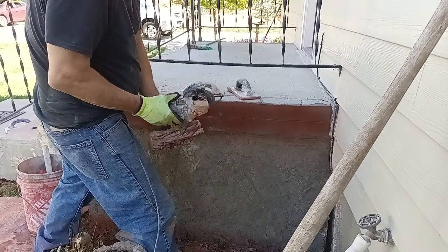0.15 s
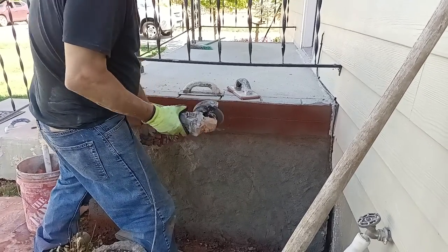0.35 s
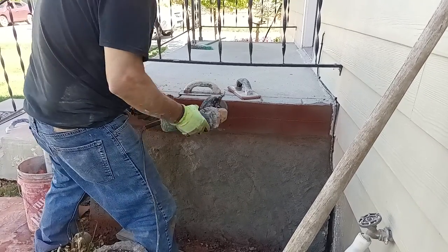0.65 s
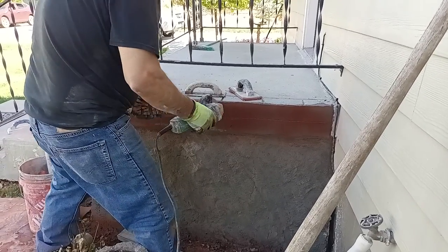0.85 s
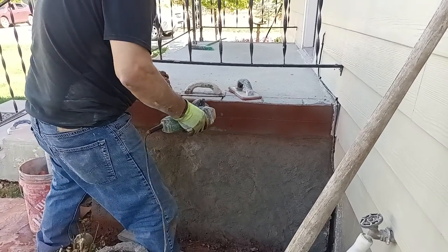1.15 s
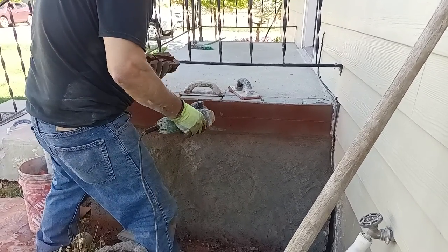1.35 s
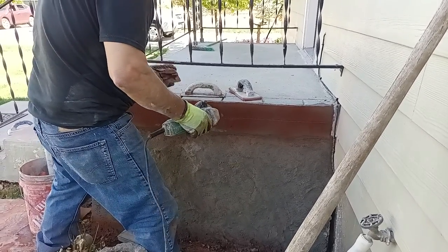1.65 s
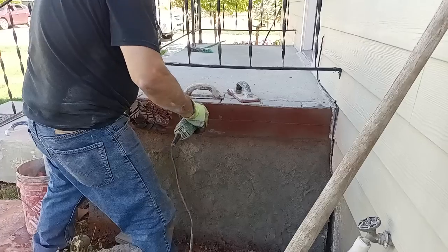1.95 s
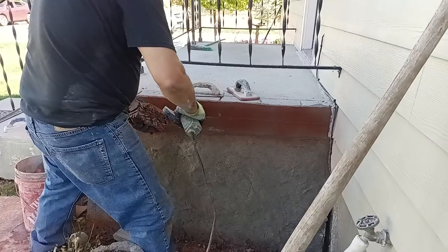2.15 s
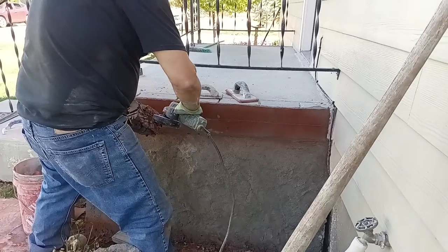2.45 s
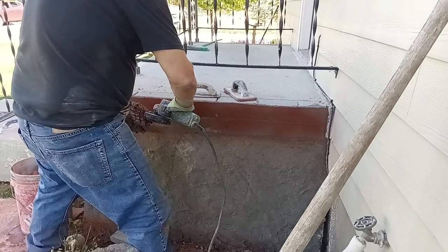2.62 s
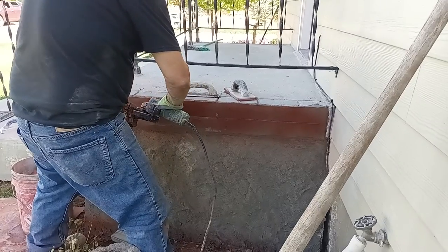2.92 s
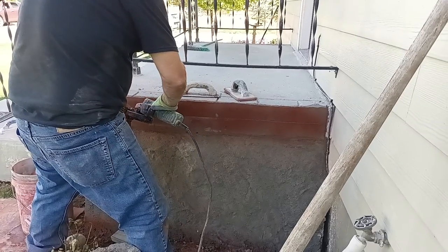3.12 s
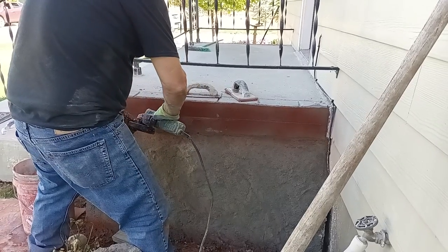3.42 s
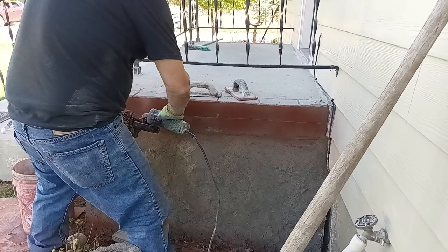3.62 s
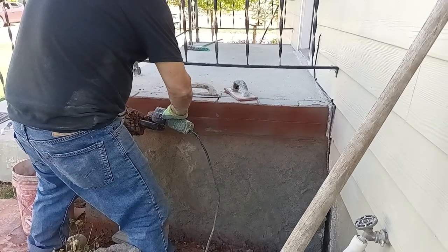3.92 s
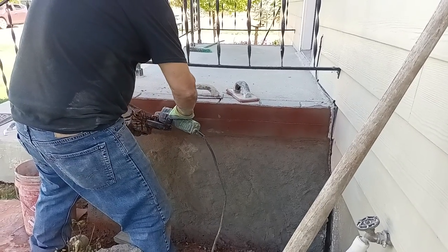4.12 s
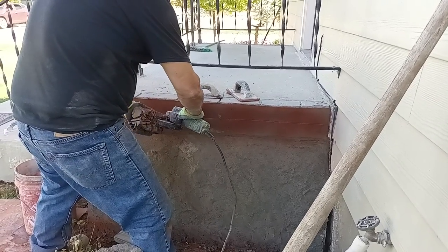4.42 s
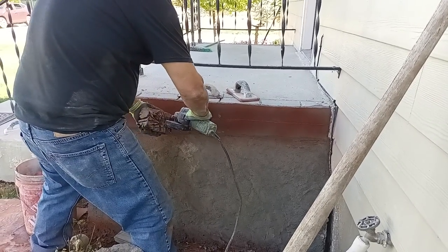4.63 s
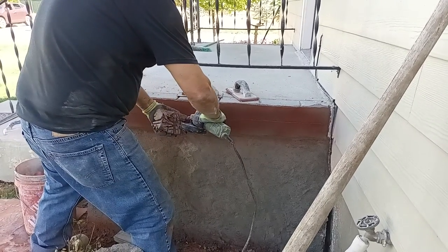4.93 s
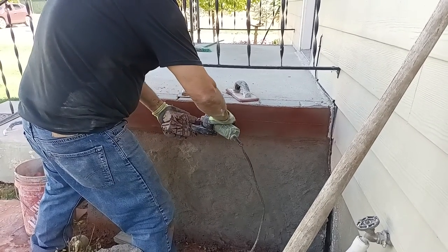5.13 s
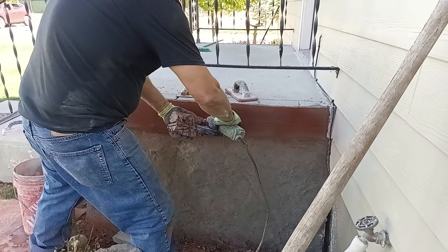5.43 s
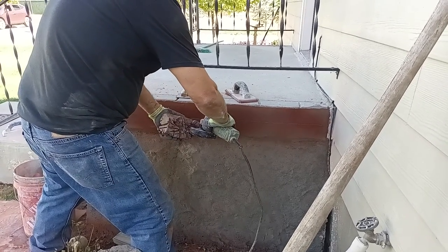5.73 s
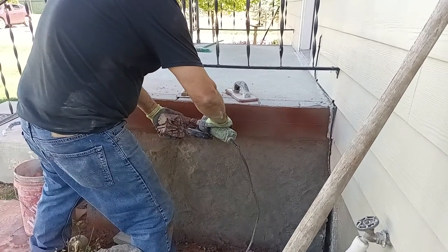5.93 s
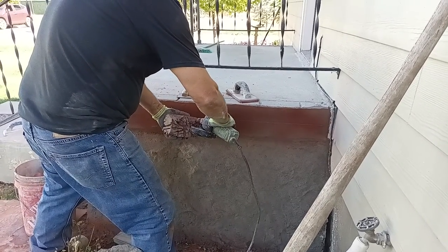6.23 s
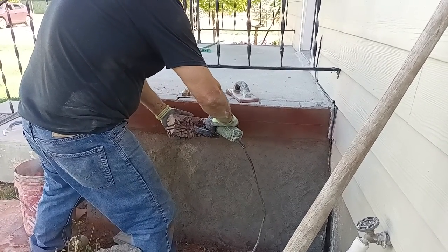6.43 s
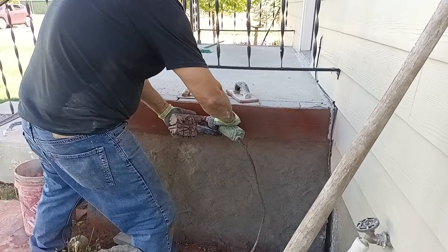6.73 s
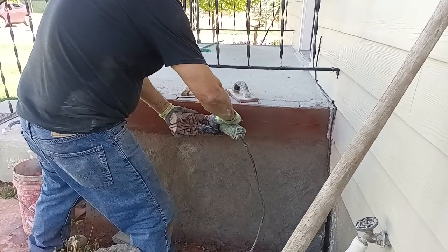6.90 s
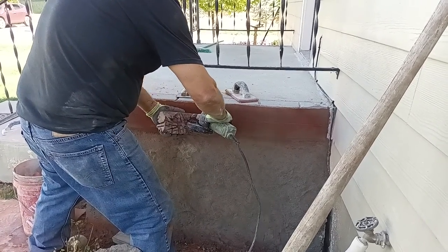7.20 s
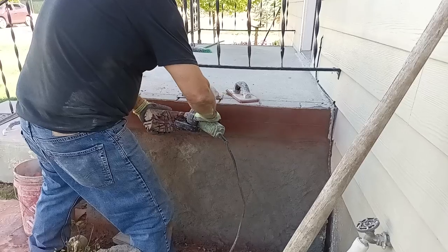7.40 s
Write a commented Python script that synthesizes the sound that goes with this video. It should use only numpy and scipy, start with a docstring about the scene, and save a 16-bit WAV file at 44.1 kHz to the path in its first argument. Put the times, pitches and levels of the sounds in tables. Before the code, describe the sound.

Loud electric grinder whirring and rasping on masonry, its disc ringing in shrill shifting squeals, with gritty hiss and low wind buffets.

```python
"""Angle grinder cutting brick

An angle grinder runs up to speed and cuts into a brick step outdoors, beside a house wall.
Grit noise rings the steel disc's modes in a chattering cut, and single modes sing out.
The shaft hums in wavering sines; the cooling fan and the brick dust are shaped noise.
The left microphone port faces away and hears a dull, late sound; wind pops on the right port."""
import sys
import numpy as np
from scipy import signal
from scipy.fft import rfft, irfft, next_fast_len
from scipy.io import wavfile
from scipy.ndimage import uniform_filter1d, map_coordinates

SR = 44100
rng = np.random.default_rng(int(sys.argv[2]) if len(sys.argv) > 2 else 0)


def wrap_up_sound(samples):
    """Save the sound to the file named by the first command line argument, as 16-bit audio."""
    columns = np.atleast_2d(samples).T
    # keep every value between -1 and 1, then stretch to whole-number steps
    tamed = np.clip(columns, -1, 1)
    steps = np.round(tamed * 32767).astype(np.int16)
    wavfile.write(sys.argv[1], SR, steps)


N = 333396
T = np.arange(N) / SR  # time of every sample, in seconds

# How hard the grit rubs, before bites and flicker are added: (time [s], level [dB])
RUBBING = [(0, -28), (.22, -29.5), (.34, -24), (2, -23), (2.62, -28), (2.67, -20.5), (3.15, -25),
           (3.55, -21), (4, -20), (4.6, -22), (5.5, -21), (5.75, -23), (6.08, -24), (6.13, -19),
           (6.3, -20.5), (7.56, -22)]

# The disc sinks into the cut at this time; the shaft sags and the fan changes over SAG_S
SINK_S, SAG_S = 2.6, .5
# The tool swings out from behind the worker's body and opens up
OPEN_S, OPENING_S = 0.26, 0.03


def amp(db):
    """Gain of a level in dB."""
    return 10 ** (np.asarray(db) / 20)


def unit(x):
    """Scale x to an rms of 1."""
    return x / np.sqrt(np.mean(x ** 2) + 1e-20)


def along(points, hz):
    """Read between (frequency, value) points on a log frequency axis."""
    f, values = np.transpose(points)
    return np.interp(np.log(hz + 1), np.log(f + 1), values)


def curves(rows):
    """One value per sample for each column after the time."""
    s, *columns = np.transpose(rows)
    return [np.interp(T, s, column) for column in columns]


def wobble(rate):
    """A smooth random curve through `rate` random points a second."""
    points = rng.standard_normal(int(N * rate / SR) + 4)
    return map_coordinates(points, [T * rate])


def after(s, rise_s):
    """A smooth step from 0 to 1, halfway at time s."""
    return 1 / (1 + np.exp(-np.clip(2 * (T - s) / rise_s, -50, 50)))


def held(s, length):
    """A gate that rises, holds and falls."""
    rise_s, fall_s = 0.027, 0.084
    rise = (T - s) / rise_s
    fall = (s + length - T) / fall_s + .5
    return np.clip(np.minimum(rise, fall), 0, 1)


def filtered(x, response):
    """Filter x by a response given as a function of frequency in Hz."""
    m = next_fast_len(N + SR // 4)
    spectrum = rfft(x, m) * response(np.fft.rfftfreq(m, 1 / SR))
    return irfft(spectrum, m)[..., :N]


def rush(points, patchy_db):
    """Two unrelated noises shaped by (Hz, dB) points, sharing patches of random gain."""
    z = signal.stft(rng.standard_normal((2, N)), nperseg=512)[2]
    field = uniform_filter1d(rng.standard_normal(z.shape[1:]), size=3, axis=0)
    field = uniform_filter1d(field, size=16, axis=1)
    noise = signal.istft(z * amp(patchy_db * unit(field)), nperseg=512)[1][:, :N]
    return unit(filtered(noise, lambda f: amp(along(points, f))))


def combed(x, depth_db):
    """Pass x through many narrow resonances that come and go."""
    z = signal.stft(x, nperseg=2048)[2]
    field = uniform_filter1d(rng.standard_normal(z.shape[1:]), size=14, axis=1)
    return unit(signal.istft(z * amp(depth_db * unit(field)), nperseg=2048)[1][:, :N])


def turns():
    """Angle of the shaft in radians: it runs up towards full speed, then sags a little in the cut."""
    full_turns_per_s, start_short_by, run_up_s = 161.5, 48.5, .45
    sag_turns_per_s = 5.5
    run_up = start_short_by * np.exp(-T / run_up_s)
    sag = sag_turns_per_s * (1 - np.exp(-np.clip(T - SINK_S, 0, None) / SAG_S))
    speed = (full_turns_per_s - run_up - sag) * (1 + 0.00303 * wobble(6))
    return 2 * np.pi * np.cumsum(speed) / SR


def contact(angle):
    """Changes of the rubbing in dB: swells at bounces and bites; the rim is out of true."""
    # Bites of the disc in the brick at set times, most of them hard, over the skimming;
    # each sound follows them more or less strongly: (time [s], level [dB])
    set_bites = [(.491, 5), (.729, 11.5), (1.726, 9), (2.024, 11), (2.278, 9), (2.326, 9), (2.51, 9.5),
                 (2.692, 10), (3.302, 6.5), (5.777, 10), (5.883, 10), (6.033, 10), (6.12, 7), (6.734, 7),
                 (7.349, 11)]
    bite_times, bite_sizes = np.transpose(set_bites)
    chatter_per_s, chatter_scatter = 20, .22  # bounces between the set bites
    chatter_db, chatter_sunk_db = 6, 4  # typical size while skimming, in the cut
    rise_s, fall_s = 0.009, 0.017

    draw = rng.standard_normal((300, 2))
    times = np.cumsum(np.exp(chatter_scatter * draw[:, 0])) / chatter_per_s
    sizes = np.where(times < SINK_S, chatter_db, chatter_sunk_db)
    sizes = sizes * np.clip(1 + .4 * draw[:, 1], 0, None)
    # leave out bounces that fall too close to a set bite
    gap = np.abs(times[:, None] - bite_times).min(axis=1)
    free = (gap > .03) & (times < T[-1])
    kicks = np.zeros(N)
    kicks[(times[free] * SR).astype(int)] = sizes[free]
    kicks[(bite_times * SR).astype(int)] = bite_sizes

    t = T[:SR // 10 + 1] - T[SR // 20]
    swell = np.exp(-(t / np.where(t < 0, rise_s, fall_s)) ** 2)
    bites_db = signal.fftconvolve(kicks, swell, "same")
    rim_db = 0.89 * np.cos(angle) + 0.5 * np.cos(2 * angle)  # once and twice a turn
    return bites_db - bites_db.mean() + 0.91 * wobble(28) + rim_db


def disc(rub_db):
    """Grit noise rings every mode a little; now and then the angle of the cut makes one sing."""
    # Modes of the disc and its guard: (frequency [Hz])
    modes_hz = [1095, 2200, 2600, 2940, 3570, 4060, 4750, 5085, 5555, 5865, 6190, 6500, 6620, 7440, 7570,
                7810, 8660, 8830, 9060, 9220, 11220]
    # Usual ring of each of those modes against the rubbing: (level [dB])
    modes_db = [-25.5, -26.5, -24, -18.5, -25, -24, -24, -15, -14, -16, -13, -13.5, -17, -11.5, -18, -43,
                -12.5, -18, -16.5, -23, -45]
    # One mode sings out, before bites and flicker:
    # (time [s], length [s], frequency near the mode [Hz], level [dB])
    squeals = [(0.28, 0.25, 3570, -30), (0.37, 0.22, 1095, -40), (0.28, 0.28, 5555, -32),
               (0.89, 0.1, 5555, -33), (1.42, .2, 5555, -34), (2.9, 0.74, 4060, -38),
               (2.66, 0.3, 4750, -39), (0.87, 1.35, 2600, -34), (0.8, 0.18, 1095, -44),
               (1.476, 0.28, 7440, -30.5), (3.78, 0.72, 5555, -35), (4.23, 0.082, 2940, -28),
               (0.683, 0.063, 7570, -24), (2.28, 0.36, 6190, -30.5), (2.39, 0.11, 5085, -30),
               (2.56, 0.55, 8660, -28.5), (3.47, 0.25, 6190, -26.5), (3.8, 0.38, 8660, -34),
               (3.47, 0.14, 11220, -29), (3.6, 0.12, 9060, -23), (3.5, 0.58, 1095, -50.5),
               (6.45, 0.25, 1095, -42.5), (2.45, 0.18, 5865, -23.5), (1.96, 0.93, 6500, -31.5),
               (2.7, 0.22, 5085, -39), (4.5, 1.2, 7810, -31.5), (4.2, 0.49, 9060, -20.5),
               (4.5, 0.592, 8660, -23.5), (4.8, 0.086, 5085, -25), (5, 0.46, 5085, -25.5),
               (5.19, 0.58, 5865, -29), (4.7, 0.54, 9220, -32), (6.1, 0.9, 5085, -29.5),
               (6.25, 0.78, 5555, -32), (6.76, 0.5, 8830, -26.5), (7.423, 0.14, 9220, -17),
               (7.3, 0.31, 9060, -24)]
    # resonance widths in Hz, otherwise 44
    widths = {2200: 90, 2600: 220, 3570: 140, 5085: 36, 8660: 70, 9060: 18}
    favour_db, favour_per_s = 2.5, 1.3  # the cut favours now one mode, now another
    sunk_ring_db = 6.5

    def nearest(hz):
        return modes_hz[np.argmin(np.abs(np.subtract(modes_hz, hz)))]

    grit_db, = curves(RUBBING)
    skimming = T < SINK_S
    out = 0
    for hz, usual_db in zip(modes_hz, modes_db):
        width = widths.get(hz, 44)
        feels = 1.25 if 5000 < hz < 8000 else .5  # these rim modes follow the bites most
        bite_db = feels * rub_db
        # skimming rings the highest modes and lowest rim mode less, low guard modes more
        sunk_side = (hz > 8000 or hz == 5085) - (2000 < hz < 2700)
        usual = bite_db + grit_db + usual_db + favour_db * wobble(favour_per_s)
        gain = amp(usual - sunk_ring_db * sunk_side * skimming)
        for s, length, mode_hz, db in squeals:
            if nearest(mode_hz) == hz:
                # once sunk, squeals follow the chatter half as much
                gain += amp(db + bite_db / (1 + (T > SINK_S))) * held(s, length)

        def ring(f):
            return 1j * f * width / (hz * hz - f * f + 1j * f * width)

        tone = unit(filtered(rng.standard_normal((2, N)), ring))
        flicker_db = 2.05 * wobble(7) + 2.28 * wobble(22)
        out = out + gain * amp(flicker_db) * tone
    return out


def shaft(angle, hidden):
    """Multiples of the shaft rate sound as broken, wavering tones, much quieter while hidden."""
    # Shaft tones before wobble and hiding: (time [s], hum level [dB], fourth multiple level [dB])
    shaft_tones = [(0, -64, -28), (.33, -52, -36), (.7, -53.5, -43.5), (1.4, -47, -45), (2.3, -51.5, -74),
                   (3.3, -56.5, -52), (4.8, -53, -53), (6, -52, -40), (6.9, -59, -50.5), (7.56, -53, -48.5)]
    # Upper tones, against their shared level: (multiple of the shaft rate, level [dB])
    upper_orders = [(2, -6.5), (3, -2), (5, 3), (7, 0.5)]
    # One multiple stands out for a moment, before wobble and hiding:
    # (time [s], length [s], multiple of the shaft rate, level [dB])
    order_swells = [(.31, 0.11, 5, -35), (.68, 0.18, 9, -40), (.9, 0.16, 10, -37), (1.544, 0.27, 5, -42.5),
                    (2.026, 0.16, 8, -39)]
    start_db, fade_db_per_s, hidden_db = -50, 2, -19.5

    def order(k, db):
        return amp(db + 3.5 * wobble(20)) * np.sin(k * angle + .9 * wobble(30))

    hum_db, fourth_db = curves(shaft_tones)
    upper_db = start_db - fade_db_per_s * T
    tones = amp(hum_db + 1.8 * wobble(6)) * np.sin(angle) + order(4, fourth_db)
    for k, db in upper_orders:
        tones += order(round(k), upper_db + db)
    for s, length, k, db in order_swells:
        tones += order(round(k), db) * held(s, length)
    return tones * amp(hidden_db * hidden) * [[1], [0]]  # no tones in the scattered sound


def fan(rub_db, hidden):
    """The cooling fan rushes as shaped, patchy noise that changes a little with load and bites."""
    # Colour of the rush: (frequency [Hz], relative level [dB per Hz])
    fan_colour = [(70, -10), (260, -34), (420, -18), (650, -7), (1100, -9), (1750, -2.5), (2200, 0),
                  (3500, 4), (4400, -4), (7000, -55)]
    free_db, hidden_db, loaded_db = -27.5, -3, -1.5  # running free; changes when hidden, in the cut
    fan_db = free_db + hidden_db * hidden + loaded_db * after(SINK_S, SAG_S)
    return amp(fan_db + 0.087 * rub_db) * combed(rush(fan_colour, patchy_db=2.5), depth_db=3.5)


def brick_dust(rub_db):
    """Brick dust hisses, flickering fast and wavering slowly; the disc's small modes comb it."""
    # Colour of the hiss: (frequency [Hz], relative level [dB per Hz])
    grit_colour = [(2500, -33.5), (4400, -13), (6000, -1), (8000, -3.5), (9200, -1), (10700, -9.5),
                   (12500, -23), (15000, -24.5)]
    grit_db, = curves(RUBBING)
    flicker_db = 1.68 * wobble(170) + 1.5 * wobble(6)  # fast flicker, slow waver
    hiss = combed(rush(grit_colour, patchy_db=2.5), depth_db=4)
    return amp(grit_db + 0.23 * rub_db + flicker_db) * hiss


def ports(pair):
    """The right port hears the tool directly; the left hears it shaded, late and partly scattered."""
    # Left port against right: (frequency [Hz], level [dB])
    shade = [(100, 10.5), (350, 6), (750, 13), (1100, 9), (1500, 6), (2000, 5), (2600, -4.5), (4300, -8),
             (6200, -13.5), (7300, -20), (8600, -34.5), (10000, -33.5), (13000, -23)]
    # How alike the two ports sound, limited to 0-1: (frequency [Hz], likeness [ratio])
    alike = [(150, 1), (1000, 0.77), (6000, 0.1), (12000, .15)]
    lag_s = 0.000858

    def right(f):
        # the power of the two ports together stays even
        return 2 / np.sqrt(1 + amp(2 * along(shade, f)))

    def left(f):
        return right(f) * amp(along(shade, f)) * np.exp(-2j * np.pi * f * lag_s)

    def left_mix(f):
        share = np.clip(along(alike, f), 0, 1)
        return left(f) * [share, np.sqrt(1 - share ** 2)]  # direct, scattered

    shaded = filtered(pair, left_mix).sum(axis=0)
    return np.array([shaded, filtered(pair[0], right)])


def wind_pop(db, edge_db, flutter_db):
    """An eddy bursts on the port: one low push with a sharp edge and a noisy flutter."""
    t = T[:SR // 8]
    push = np.sin(2 * np.pi * 150 * t * np.exp(-t / 0.04)) * np.exp(-t / 0.0031)
    edge = np.sin(2 * np.pi * 820 * t) * np.exp(-t / 0.00037)
    hiss = rng.standard_normal(len(t)) * np.exp(-t / 0.021)
    flutter = signal.lfilter(*signal.butter(3, 2700 / SR), hiss)  # low-pass at 1350 Hz
    return amp(db) * (push + amp(edge_db) * edge + 3 * amp(flutter_db) * flutter)


def wind():
    """Eddies make a lumpy low buffet on both ports and pops, almost all on the right one."""
    # Wind buffet before wobble and each port's own gain: (time [s], level [dB])
    gust = [(0, -91), (.4, -68), (3.3, -61), (3.9, -55.5), (4.4, -42.5), (4.75, -37), (5.05, -48),
            (5.9, -58), (6.4, -51), (6.9, -41.5), (7.56, -55.5)]
    # Pops at set times, strong and faint; edge and flutter are set against the push,
    # before the flutter's own gain:
    # (time [s], push level [dB], edge level [dB], flutter level [dB])
    set_pops = [(2.651, -5, -6, -9), (2.657, -10, 19, -11), (2.661, -15, 17.5, -4), (4.288, -11, -20, -18),
                (4.377, -4, -34, -38), (4.409, -2.5, -22, -21), (4.473, 1, -13.5, -16.5),
                (4.569, -1, -20, -15), (4.595, -1, -17, -18.5), (4.628, 1, -29, -32), (4.655, -2.5, 0, -6),
                (4.723, 5.5, -19.5, -22), (4.743, -3.5, -17, -11.5), (4.774, -5.5, -12, -14),
                (4.89, -11, -1, -4), (4.958, -8, -15, -13.5), (4.974, 1.5, -6, -20), (5.655, -17, -12, -22),
                (6.785, -16, -25, -15), (7.501, -6, -28, -17.5)]
    # Colour of the buffet: (frequency [Hz], relative level [dB per Hz])
    buffet_colour = [(60, -6), (200, -1.5), (450, -8.5), (3000, -43)]
    # scattered pops that follow the gusts: how many are drawn, greatest level over the gust
    scattered_count, scattered_over_gust_db = 150, 27.5

    gust_db, = curves(gust)
    buffet = amp(gust_db + 4.5 * wobble(14)) * rush(buffet_colour, patchy_db=3)
    all_pops = list(set_pops)
    for u, v, w in rng.random((scattered_count, 3)):
        s = u * T[-1]
        # keep scattered pops clear of the set ones
        if min(abs(s - pop[0]) for pop in set_pops) > .03:
            db = gust_db[int(u * N)] + scattered_over_gust_db - 12 * v
            all_pops.append((s, db, -8 - 14 * w, -8 - 14 * w))
    pops = np.zeros(N + SR)
    for s, db, edge_db, flutter_db in all_pops:
        pop = wind_pop(db, edge_db, flutter_db)
        pops[round(s * SR):][:len(pop)] += pop
    # gains in dB: left port, right port
    return buffet * amp([[-8], [5]]) + pops[:N] * amp([[-40], [0]])


def scene():
    """The tool sounds through the two ports; the wind blows straight on them."""
    angle = turns()
    rub_db = contact(angle)
    hidden = 1 - after(OPEN_S, OPENING_S)
    tool = disc(rub_db) + shaft(angle, hidden) + fan(rub_db, hidden) + brick_dust(rub_db)
    return ports(tool) + wind()


def record(dry):
    """The microphones cut deep bass, peaks round off, and nothing above the band limit is kept."""
    bass_hz, ceiling, top_hz = 58, .78, 15750
    lean = filtered(dry, lambda f: (1j * f / (bass_hz + 1j * f)) ** 3)
    soft = lean / (1 + np.abs(lean / ceiling) ** 4) ** (1 / 4)
    return filtered(soft, lambda f: f < top_hz)


dry = scene()
out = record(dry)
wrap_up_sound(out)
```